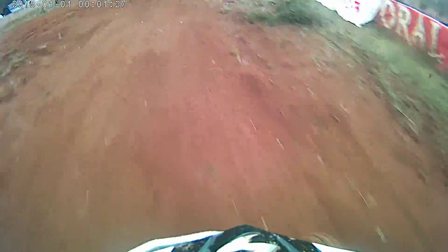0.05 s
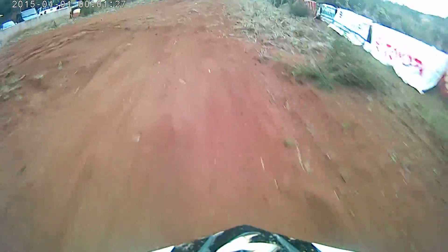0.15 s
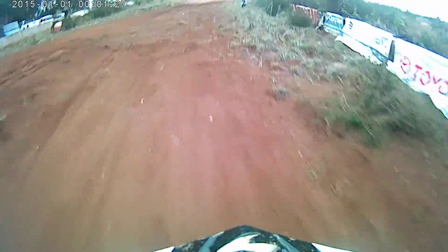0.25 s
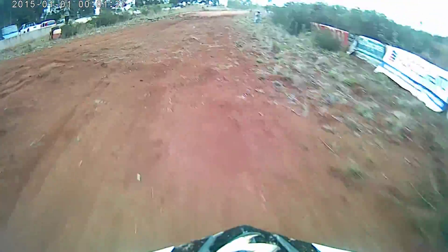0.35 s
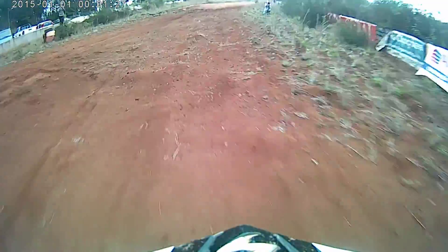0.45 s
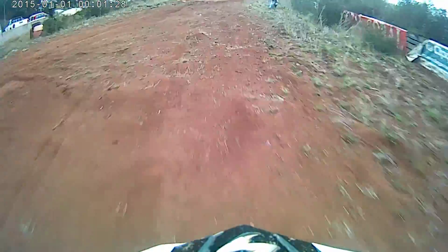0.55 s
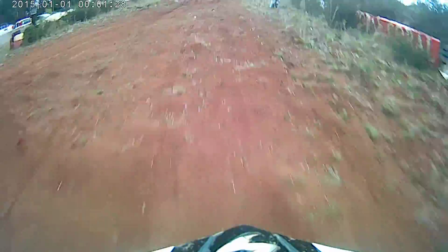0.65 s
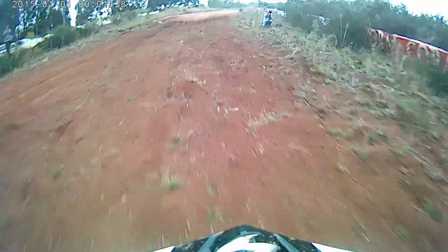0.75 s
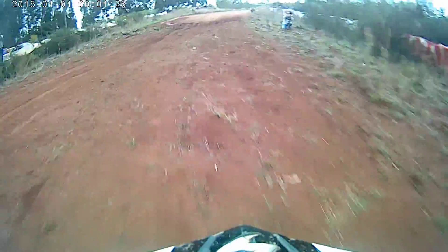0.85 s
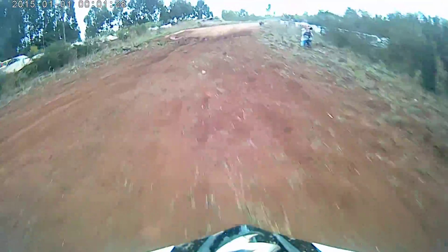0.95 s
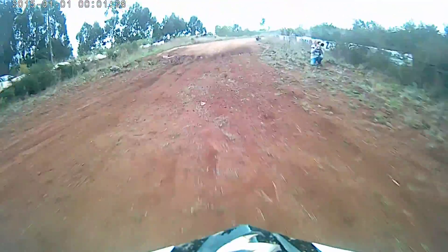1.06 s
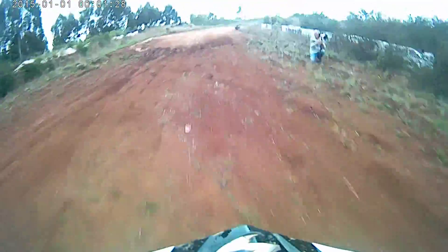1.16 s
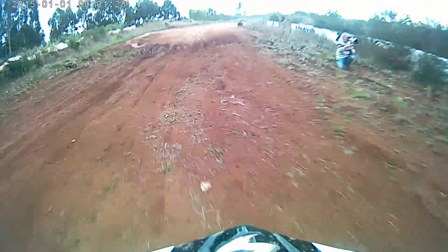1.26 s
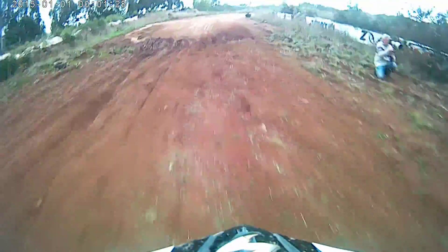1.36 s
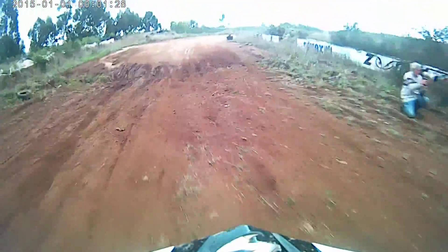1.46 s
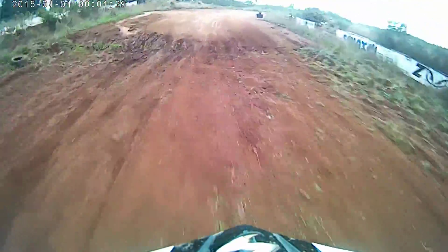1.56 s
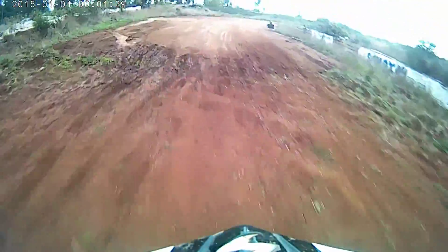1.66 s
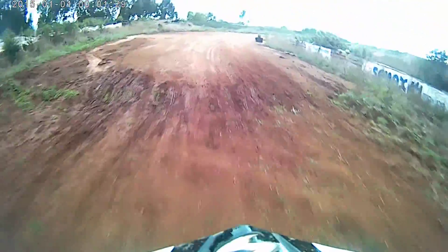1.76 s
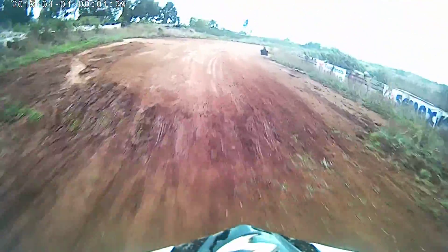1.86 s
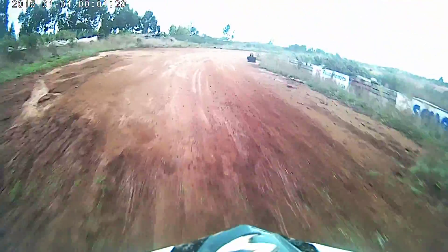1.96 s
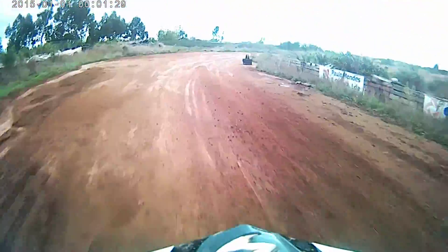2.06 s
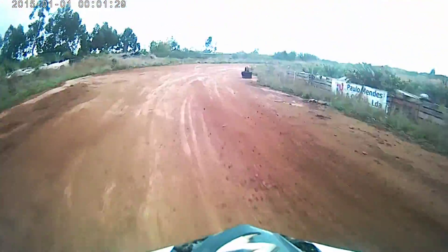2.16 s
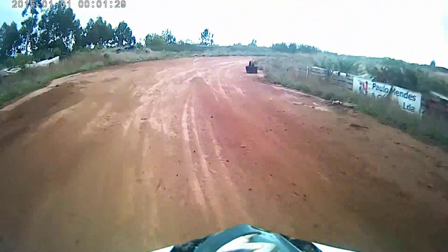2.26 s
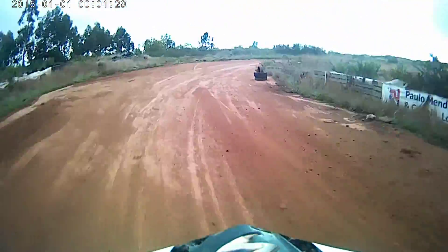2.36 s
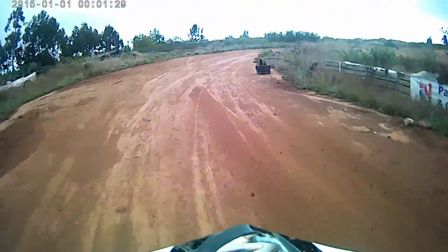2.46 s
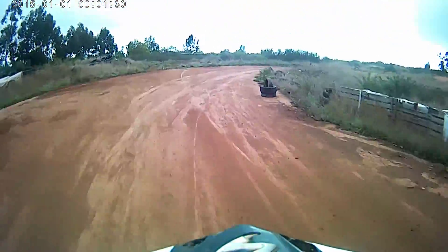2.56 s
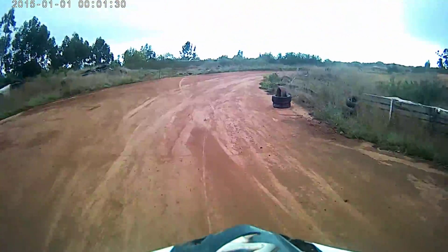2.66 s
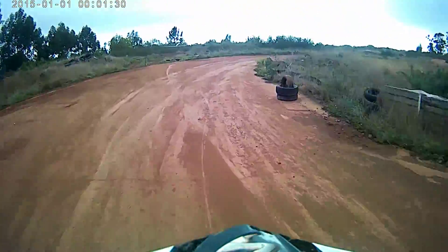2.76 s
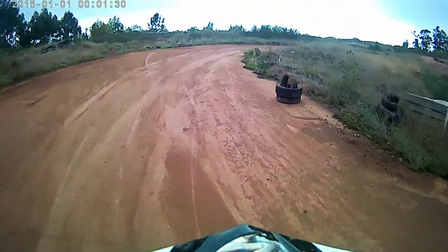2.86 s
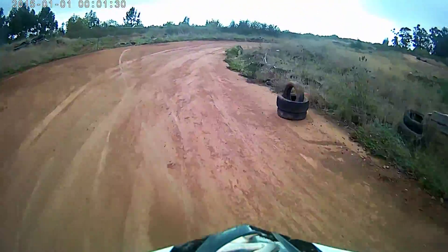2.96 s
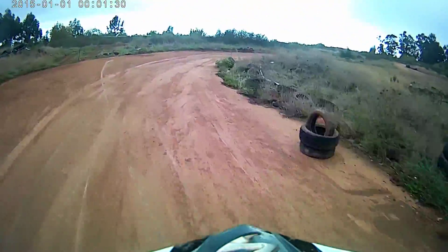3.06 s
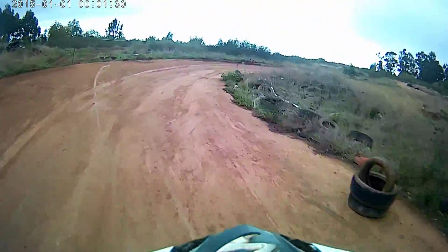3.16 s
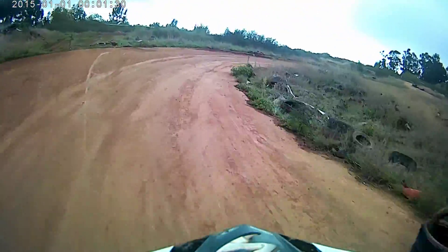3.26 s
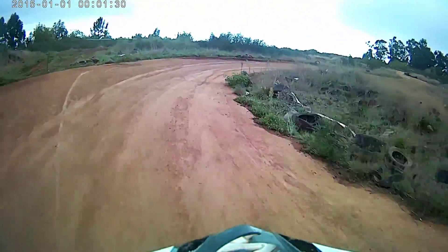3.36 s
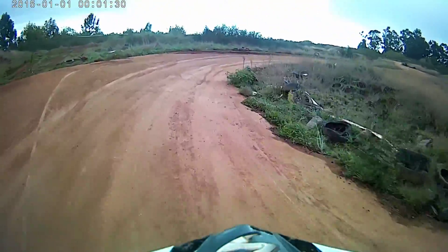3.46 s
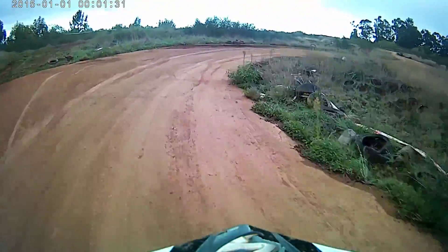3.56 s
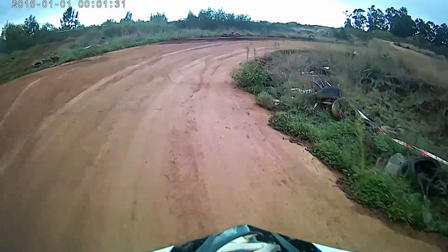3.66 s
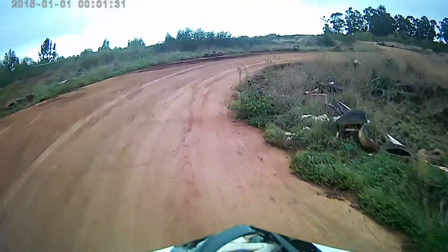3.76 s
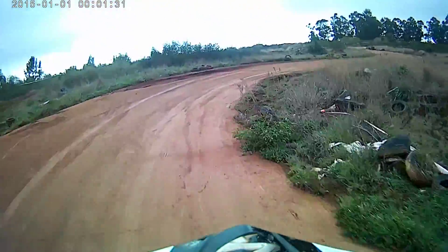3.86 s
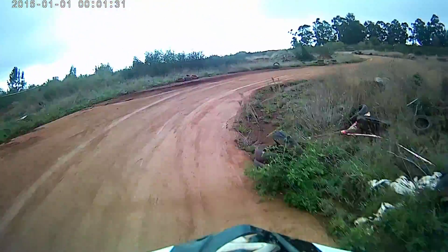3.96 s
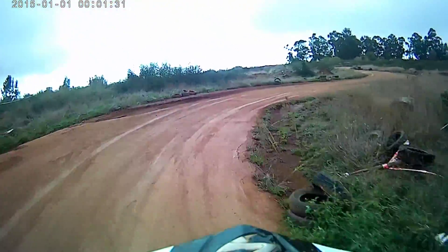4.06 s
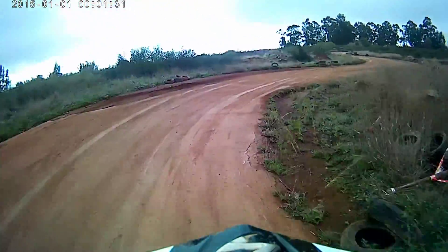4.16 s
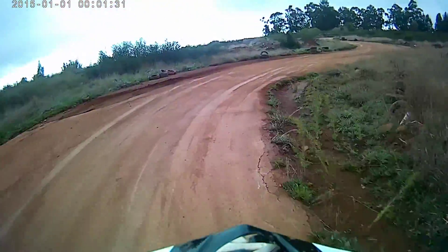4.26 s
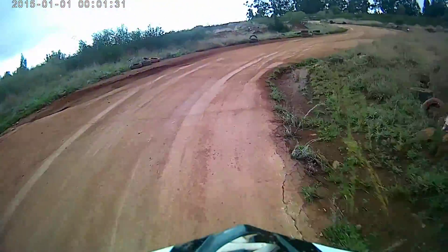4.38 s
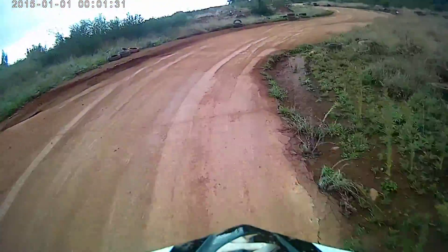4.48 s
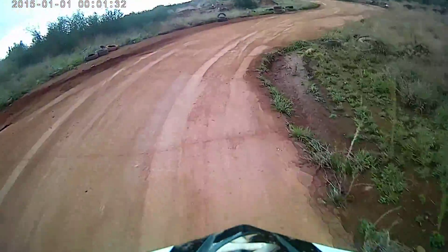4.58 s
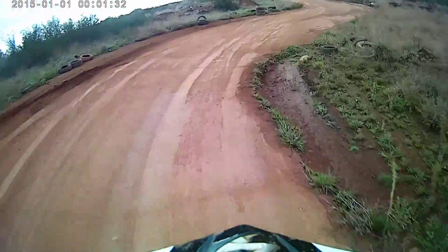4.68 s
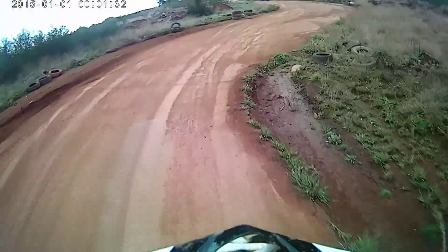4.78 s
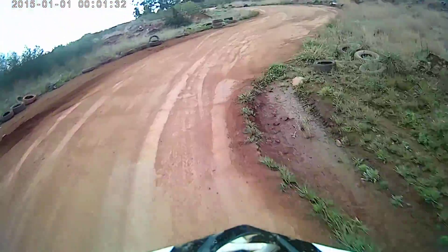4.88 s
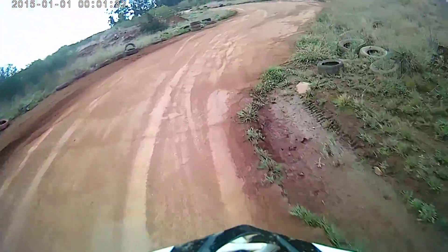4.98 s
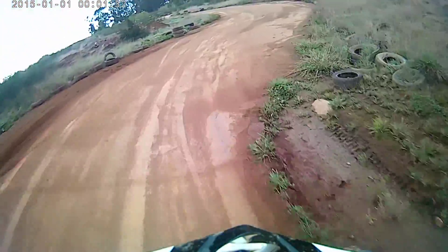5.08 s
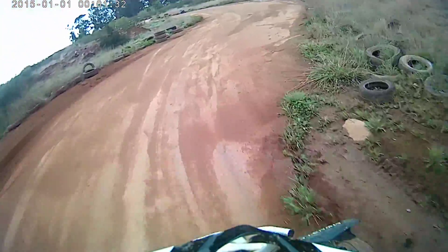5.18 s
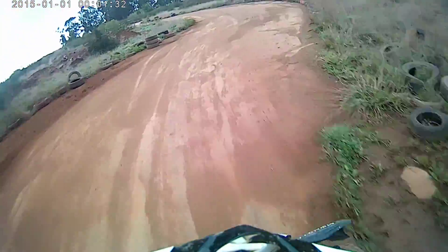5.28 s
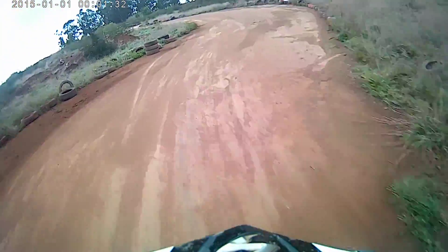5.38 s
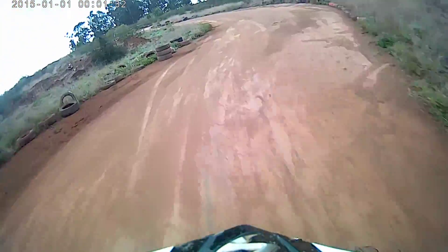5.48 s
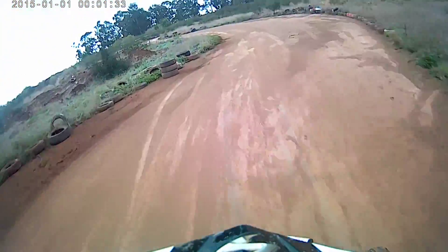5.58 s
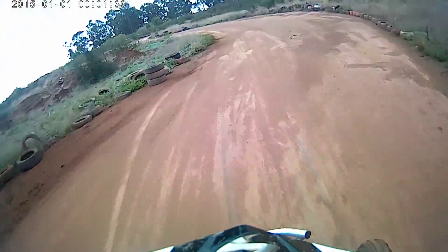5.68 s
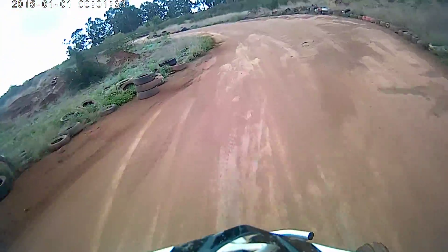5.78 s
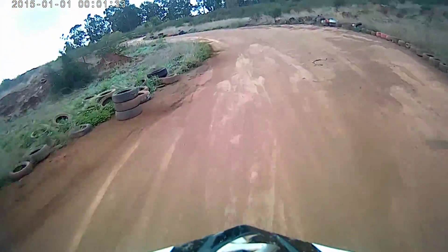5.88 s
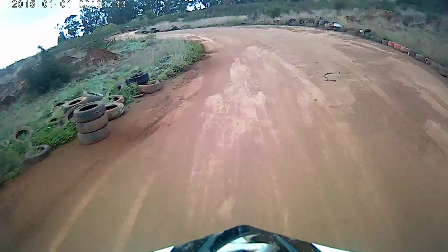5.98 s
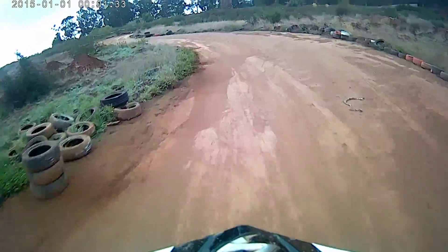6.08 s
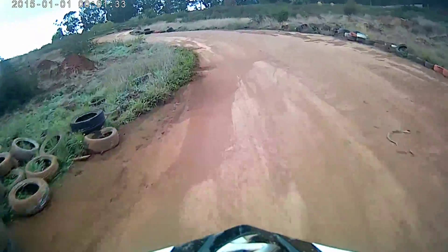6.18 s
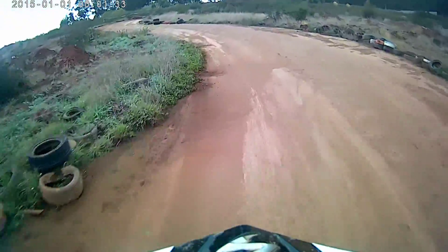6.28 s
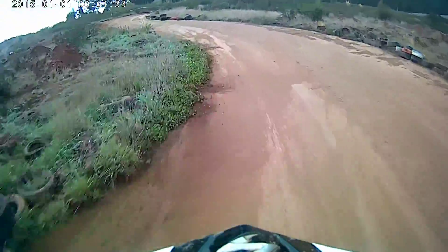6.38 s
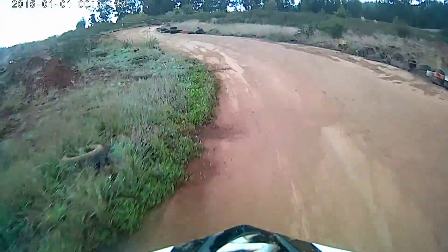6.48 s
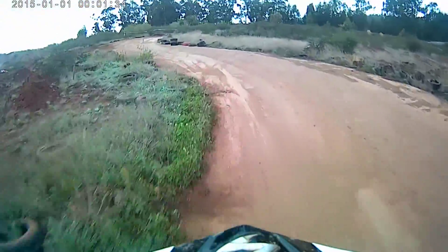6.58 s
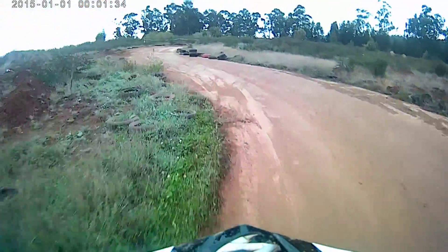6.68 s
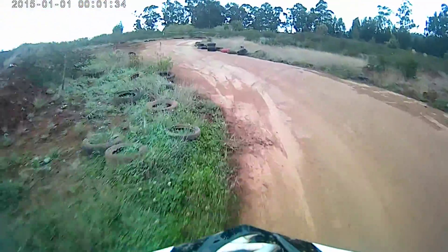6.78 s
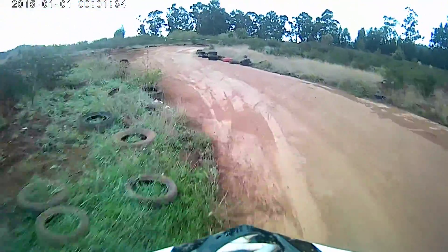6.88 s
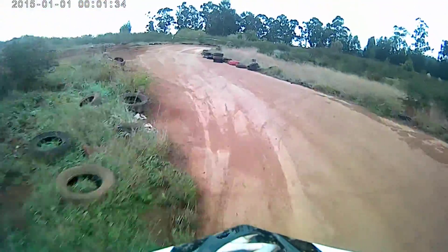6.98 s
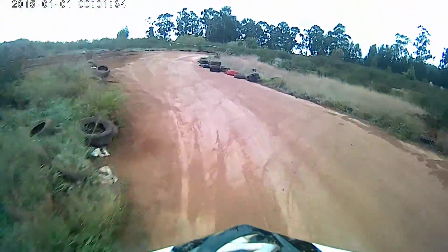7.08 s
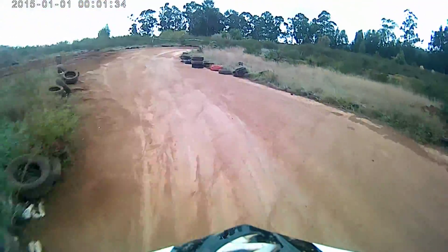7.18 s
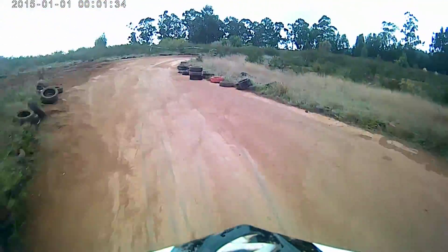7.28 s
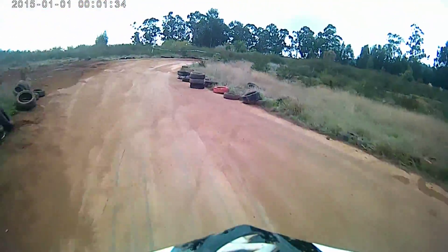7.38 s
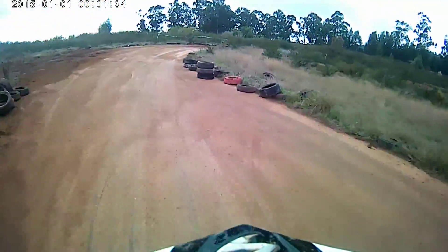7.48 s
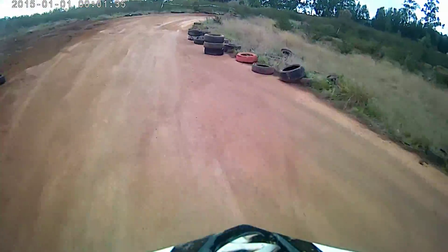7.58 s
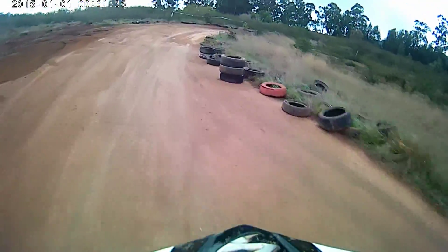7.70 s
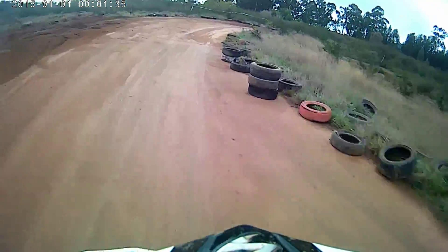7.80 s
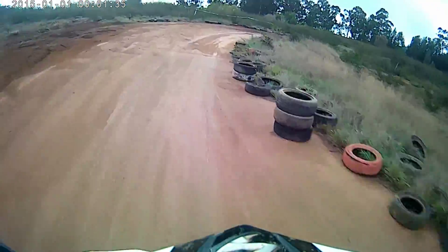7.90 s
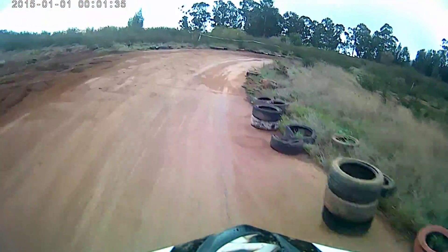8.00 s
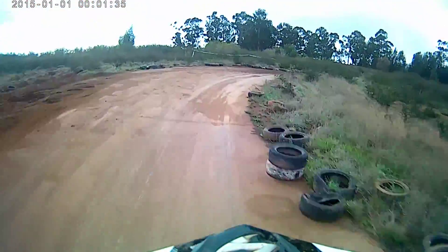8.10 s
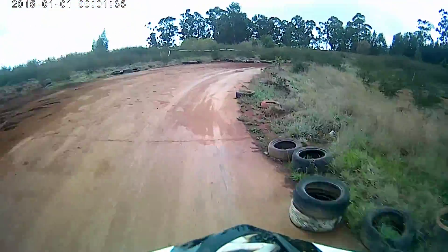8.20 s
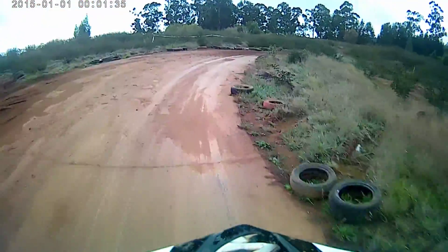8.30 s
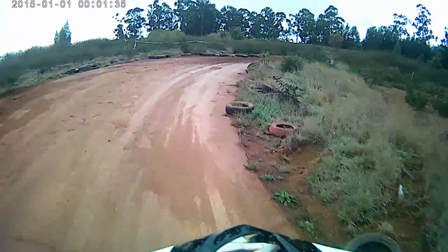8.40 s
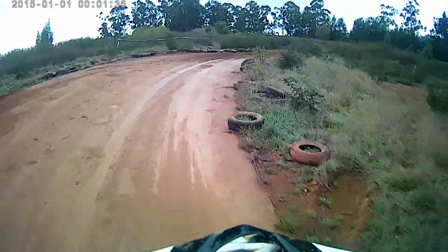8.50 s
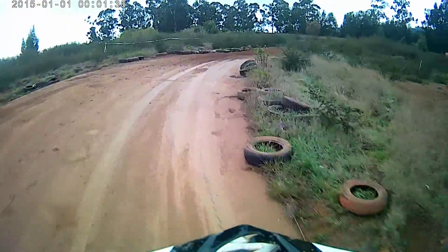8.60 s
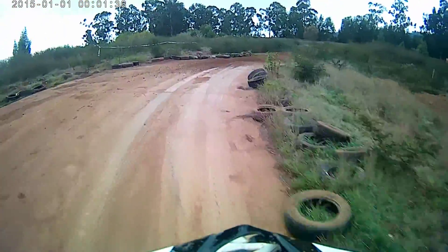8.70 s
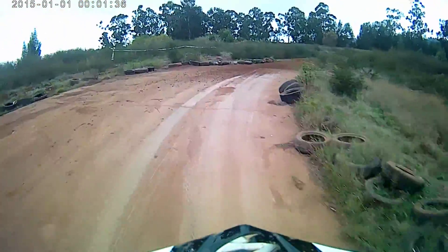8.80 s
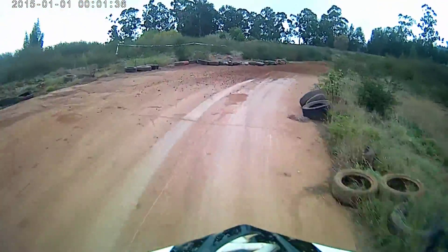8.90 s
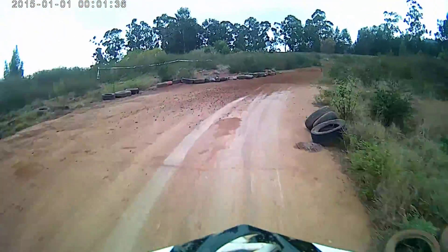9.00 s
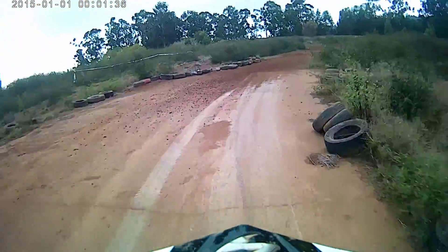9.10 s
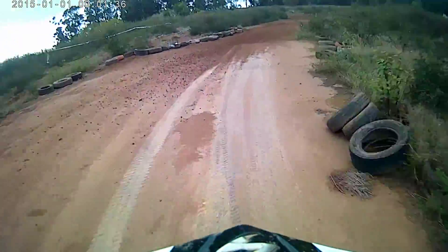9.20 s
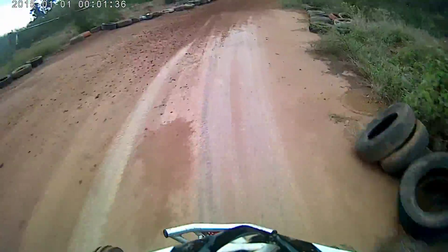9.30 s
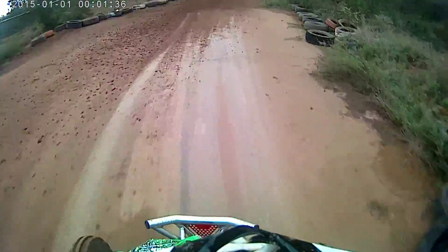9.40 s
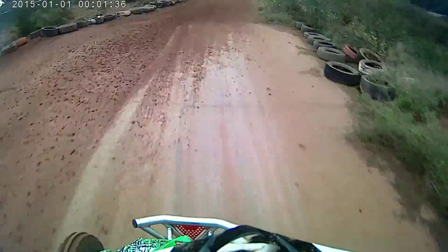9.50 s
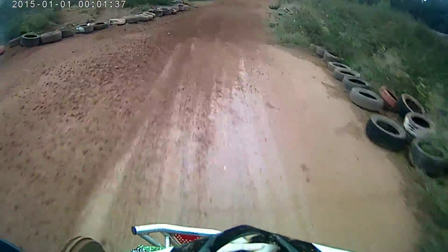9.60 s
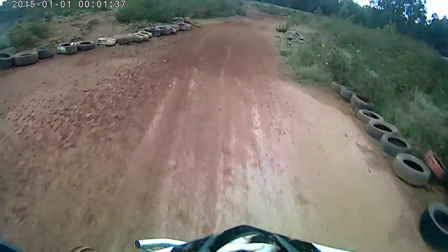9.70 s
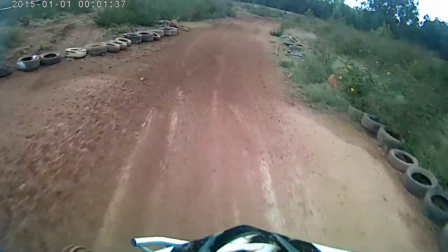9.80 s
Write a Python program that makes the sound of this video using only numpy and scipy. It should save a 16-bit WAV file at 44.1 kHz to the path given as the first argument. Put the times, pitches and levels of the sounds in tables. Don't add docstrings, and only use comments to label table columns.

```python
import sys
import numpy as np
from scipy import signal
from scipy.fft import rfft, irfft, next_fast_len
from scipy.io import wavfile
from scipy.ndimage import uniform_filter1d

SR = 44100
rng = np.random.default_rng(int(sys.argv[2]) if len(sys.argv) > 2 else 0)


def volts_from_db(level):
    exponent = np.asarray(level, float) / 20
    return 10 ** exponent


def wav_out(sig):
    wavfile.write(sys.argv[1], SR, np.round(np.clip(np.atleast_2d(sig).T, -1, 1) * 32767).astype(np.int16))


N = 434385
TOP_RATE_HZ = 72


def rms_one(x):
    return x / np.sqrt(np.mean(x ** 2) + 1e-20)


def in_time(rows):
    time_s, *columns = np.transpose(rows)
    return [np.interp(np.arange(N) / SR, time_s, column) for column in columns]


def at_hz(points, hz):
    curve_hz, curve_db = np.array(points).T[:2]
    return np.interp(np.log(hz), np.log(curve_hz), curve_db)


def drift(rate_hz):
    r = np.exp(-80 * np.pi * rate_hz / SR)
    slow = signal.lfilter([1], [1, -2 * r, r * r], rng.standard_normal(N // 40 + 2002))[2000:]
    return np.interp(np.arange(N) / 40, np.arange(len(slow)), rms_one(slow))


def band_noise_filter(order, low_hz, high_hz, x):
    return signal.sosfilt(signal.butter(order, [low_hz, high_hz], "band", fs=SR, output="sos"), x)


def evened(x, seconds):
    return x / np.sqrt(uniform_filter1d(x ** 2, int(seconds * SR)) + 1e-12)


def resonate(x, modes, wander_db, sign):
    out = 0
    for k, (hz, width_hz, db) in enumerate(modes):
        r = np.exp(-np.pi * width_hz / SR)
        zeros = np.array([1, 0, -1]) * (1 - r * r) / 2
        ring = signal.lfilter(zeros, [1, -2 * r * np.cos(2 * np.pi * hz / SR), r * r], x)
        out = out + sign ** k * volts_from_db(db + wander_db * drift(1.7)) * ring
    return out


def layer_db(rate_hz, opening, base_db, db_per_hz, open_db):
    return base_db + db_per_hz * (rate_hz - 60) + open_db * opening


def controls():
    # (time [s], firing rate [Hz])
    rolling = [(0.08, 56.4), (0.46, 49.0), (0.85, 50.4), (1.19, 67.8), (1.22, 66.4), (2.28, 59.2),
               (2.32, 55.9), (3.18, 47.3), (4.49, 41.9), (5.2, 51.7), (5.28, 56.0), (6.12, 68.4),
               (6.67, 58.9), (7.28, 56.8), (7.76, 63.9), (8.4, 49.3), (8.58, 46.1), (9.54, 53.5)]
    # (opens [s], shuts [s], roll-on [s], opening [0-1.3], wheelspin [Hz of firing])
    bursts = [(-0.086, 0.375, 0.15, 0.59, 23.2), (0.355, 0.796, 0.17, 0.64, 27.6),
              (0.813, 0.997, 0.08, 0.74, 24.6), (1.217, 1.358, 0.03, 0.19, -1.8),
              (1.319, 1.463, 0.13, 0.74, 14.6), (1.534, 1.763, 0.16, 0.66, 11.0),
              (1.945, 2.163, 0.06, 0.05, 2.2), (2.983, 3.112, 0.09, 0.11, 7.6),
              (3.298, 3.645, 0.14, 0.02, 10.6), (3.452, 3.64, 0.04, 0.25, -1.1),
              (4.505, 5.408, 0.31, 0.93, 9.4), (5.395, 5.57, 0.12, 1.06, 5.4),
              (5.586, 6.171, 0.12, 0.91, 4.4), (6.222, 6.42, 0.26, 1.29, 13.9),
              (6.615, 6.738, 0.2, 0.94, 9.4), (6.787, 7.091, 0.24, 0.79, 7.8),
              (7.283, 7.466, 0.09, 0.93, 11.4), (7.459, 7.826, 0.1, 0.82, 14.3),
              (8.559, 8.763, 0.12, 0.57, 11.8), (8.903, 9.658, 0.24, 0.72, 16.2),
              (9.676, 9.97, 0.11, 0.96, 15.0)]
    shut_s, spin_down_s, flywheel_s = .088, .128, .014
    hang_s, snap_s, regrip_s = .035, .025, .03
    t, opening, spin_hz = np.arange(N) / SR, np.zeros(N), np.zeros(N)
    next_opens = [row[0] for row in bursts[1:]] + [np.inf]
    for (opens, shuts, roll_on, amount, wheelspin), following in zip(bursts, next_opens):
        rise = (t - opens) / roll_on
        if following - shuts < regrip_s:
            fall = (shuts - t) / shut_s
        else:
            fall = (shuts + hang_s - t) / snap_s
        spin_fall = (shuts - t) / spin_down_s
        opening += amount * np.clip(np.minimum(rise, 1 + fall), 0, 1)
        spin_hz += wheelspin * np.clip(np.minimum(rise, 1 + spin_fall), 0, 1)
    r = np.exp(-1 / (flywheel_s * SR))
    lagged_hz = signal.lfilter([1 - r], [1, -r], spin_hz, zi=[r * spin_hz[0]])[0]
    rate_hz = in_time(rolling)[0] + lagged_hz
    pick_up = uniform_filter1d(np.gradient(rate_hz) * SR, SR // 10)
    return rate_hz, opening, pick_up


def engine_load(rate_hz, throttle, pick_up):
    open_load = 0.2 + .012 * np.maximum(TOP_RATE_HZ - rate_hz, 0)
    return np.clip(0.084 + open_load * throttle + 0.0013 * pick_up, 0, 1)


def exhaust_boom(cycles, rate_hz, opening, throttle, rough):
    # (frequency [Hz], level [dB])
    exhaust = [(80, -1), (125, 0.5), (170, -8.5), (215, -2.5), (265, -6.5), (320, -1.5), (360, -10.5),
               (405, -23), (440, -12), (490, -2), (600, -14.5), (670, -25), (780, -10.5), (1100, -27)]
    # (order, level at open throttle [dB], level at shut throttle [dB])
    pulse = [(2, -7, 1.5), (3, 2, 0), (4, -5.5, 2), (5, 4, 1), (6, -1, 1.5), (7, -1, -0.5), (8, 1, -1),
             (9, 3.5, -0.5), (10, -1, -0.5), (11, 2.5, -9.5), (12, -5.5, -2), (13, 0, -6), (14, 0, 1.5)]
    pipe_hz, pipe_width_hz, pipe_lift_db = 320, 13, 9
    first_db = layer_db(rate_hz, opening, -31, .35, 5.7)
    lug_db = 0.2374 * throttle * np.maximum(TOP_RATE_HZ - rate_hz, 0)
    boom_db = layer_db(rate_hz, opening, -25, 0.18, 3.1) + lug_db
    plain, coloured = 0, 0
    angle = 2 * np.pi * (cycles + 0.1097)
    for k, open_db, shut_db in pulse:
        order_hz = k * rate_hz
        flutter_db = (1 + 3 * rough) * drift(12)
        waver = .09 * rough * k * drift(16)
        shape_db = open_db * throttle + shut_db * (1.5 - throttle)
        level = volts_from_db(at_hz(exhaust, order_hz) + shape_db + flutter_db)
        tone = -level * np.cos(k * angle + rng.normal(0, 0.74) + waver)
        on_pipe = (1 - rough) * np.exp(-((order_hz - pipe_hz) / pipe_width_hz) ** 2)
        plain = plain + tone
        coloured = coloured + tone * volts_from_db(pipe_lift_db * on_pipe)
    first = -np.sqrt(2) * volts_from_db(first_db + 2.0 * drift(34.0) + 2.1 * drift(4.8)) * np.cos(angle)
    half = volts_from_db(first_db - 12.5) * np.cos(angle / 2 + 2.4 * drift(1.5))
    orders = coloured / np.sqrt(uniform_filter1d(plain ** 2, SR // 10))
    return first + half + volts_from_db(boom_db - 0.74) * orders


def firings(cycles, load, sharp, fade, spread_db, floor):
    turn = cycles.astype(int)
    strength, late = rng.standard_normal((turn[-1] + 2, 2)).T
    clicks = np.zeros(N)
    at = np.flatnonzero(np.diff(turn)) + 1
    jitter = (late[turn[at]] * .00009 * SR).astype(int)
    clicks[np.clip(at + jitter, 0, N - 1)] = 1
    blow_down = np.exp(-fade * (cycles % 1))
    valve_puff = .33 * np.exp(-fade * ((cycles + .52) % 1))
    puffs = (blow_down + valve_puff) * rng.standard_normal(N)
    gated = (sharp * load * clicks + puffs) * volts_from_db(spread_db * strength[turn])
    return gated + floor * (1.15 - load) * rng.standard_normal(N)


def case_bark(cycles, load, rate_hz, opening):
    # (frequency [Hz], width [Hz], level [dB])
    case_modes = [(840, 80, -7.5), (1080, 90, -10), (1255, 178, 5), (1375, 71, 2.5), (1550, 80, 0.5),
                  (1665, 120, 5), (1838, 69, -3.5), (2148, 250, -6.5)]
    blasts = firings(cycles, load, sharp=35, fade=3.4, spread_db=1.3, floor=.46)
    ringing = resonate(blasts, case_modes, wander_db=4.0, sign=0.94)
    bark = band_noise_filter(4, 920, 2200, ringing)
    return volts_from_db(layer_db(rate_hz, opening, -27.5, 0.32, 9.09) + 0.74) * evened(bark, .06)


def panel_knocks(cycles, load, rate_hz, opening):
    # (frequency [Hz], width [Hz], level [dB])
    panels = [(496.6, 70, 0.5), (586, 140, -1), (791, 110, -3.5)]
    blows = firings(cycles, load, sharp=42, fade=4, spread_db=2, floor=.2)
    knocks = resonate(blows, panels, wander_db=2.0, sign=-0.98)
    return volts_from_db(layer_db(rate_hz, opening, -38.5, .2, 10.3)) * evened(knocks, .1)


def valve_clatter(cycles, load, rate_hz, opening):
    # (frequency [Hz], width [Hz], level [dB])
    gear = [(2772, 333, -3), (3214, 290, 0), (3545, 800, -9)]
    taps = firings(cycles, load, sharp=6.5, fade=3.4, spread_db=4.5, floor=.9)
    clatter = resonate(taps, gear, wander_db=1.5, sign=-1.076)
    return volts_from_db(layer_db(rate_hz, opening, -43.5, 0.4, 5) + 1.0) * evened(clatter, .12)


def terrain():
    # (time [s], pressure [full scale], length [ms], rebound share)
    jolts = [(0.022, -0.58, 24.6, 0.17), (0.212, 0.43, 20.3, 1.5), (0.256, -0.3, 14, 0.3),
             (0.327, 0.32, 61, 1.11), (0.359, -0.76, 26, 1.07), (0.434, 0.31, 45, 0.9),
             (0.601, 0.21, 34, 1.4), (0.747, 0.36, 16.5, 2.5), (0.82, 0.65, 28, 1),
             (0.954, 0.23, 30.4, 2.3), (1.079, 0.29, 27, 0.0), (1.102, 0.25, 13.8, 2.9),
             (1.112, 0.23, 11.5, 2.5), (1.192, 0.3, 13, 0.8), (1.536, 0.38, 35, 1.1),
             (1.75, -0.23, 36, 1.5), (1.925, -0.15, 51, 0.2), (2.105, -0.27, 36, 1.7),
             (2.188, 1.11, 17, -0.14), (2.197, -1.1, 43, 0.28), (2.389, -0.3, 31, 0.5),
             (2.543, 0.16, 30.3, 1), (3.858, 0.12, 37.2, 1.5), (3.976, 0.23, 40, 0.86),
             (6.083, -0.061, 30.7, 3), (7.321, 0.33, 33.1, -0.4), (7.643, -0.23, 30.2, 0.4),
             (9.256, 0.26, 27.2, 2.3)]
    # (time [s], frequency [Hz], level [dB], t60 [s])
    thuds = [
        (2.232, 68, 2.5, 0.054),
        (1.11, 180, -16.5, 0.073),
    ]
    # (time [s], level [dB])
    shake = [
        (0.0, -21.5),
        (2.2, -25),
        (4.3, -29.5),
        (9.85, -24.5),
    ]
    rebound_lengths = 1.39
    t, out = np.arange(N) / SR, np.zeros(N)
    for s, pressure, ms, rebound in jolts:
        near = slice(max(int((s - .15) * SR), 0), int((s + .25) * SR))
        lengths = (t[near] - s) * 1000 / ms
        shove = 2. ** (-4 * lengths ** 2)
        swing_back = rebound * 2. ** (-4 * (lengths - rebound_lengths) ** 2)
        out[near] += pressure * (shove - swing_back)
    for s, hz, db, t60 in thuds:
        age = np.maximum(t - s, 0)
        out += volts_from_db(db - 60 * age / t60) * np.sin(2 * np.pi * hz * age)
    bumps = band_noise_filter(2, 4.5, 16.0, rng.standard_normal(N + SR))[SR:]
    return out + volts_from_db(in_time(shake)[0]) * rms_one(bumps)


def wind(level_db):
    # (frequency [Hz], level [dB per Hz])
    spectrum_db = [(30, -18), (60, 1.5), (120, -16.5), (250, -8.5), (400, -16), (600, -16), (900, -12)]
    out, edges_hz = 0, 28 * 2 ** np.arange(0, 5.1, .5)
    white = rng.standard_normal((2, N))
    for k, (low, high) in enumerate(zip(edges_hz, edges_hz[1:])):
        band = band_noise_filter(2, low, high, white[k % 2])
        out = out + band * volts_from_db(at_hz(spectrum_db, np.sqrt(low * high)) + 1.0 * drift(7.4))
    return volts_from_db(level_db) * rms_one(out)


def scene():
    # (time [s], roughness [0-1])
    ground = [
        (0, 1),
        (1.8, .9),
        (2.3, .25),
        (3.0, .25),
        (4.5, .4),
        (4.7, .15),
        (9.85, .18),
    ]
    rate_hz, opening, pick_up = controls()
    throttle = np.clip(opening * 1.35, 0, 1)
    load = engine_load(rate_hz, throttle, pick_up)
    rough = np.clip(in_time(ground)[0] + .004 * np.abs(pick_up), 0, 1)
    cycles = np.cumsum(rate_hz) / SR
    engine = exhaust_boom(cycles, rate_hz, opening, throttle, rough)
    engine += case_bark(cycles, load, rate_hz, opening)
    engine += panel_knocks(cycles, load, rate_hz, opening)
    engine += valve_clatter(cycles, load, rate_hz, opening)
    rush = wind(layer_db(rate_hz, opening, -29.5, 0.28, 0.67))
    return (engine + terrain() + rush)[None]


def low_pass(x):
    return signal.sosfilt(signal.butter(12, 15870, fs=SR, output="sos"), x)


def record(dry):
    # (low edge [Hz], high edge [Hz], share of time kept [0-1])
    fringe = [(3560, 3690, .8), (3690, 3830, .6), (3830, 3960, .35), (3960, 4100, .3), (4180, 4320, .45),
              (4320, 4520, .35)]
    frame, overload = 1024, .704
    squeezed = dry / (1 + (dry / .86) ** 4) ** .25
    narrow = signal.sosfilt(signal.butter(9, 3750, fs=SR, output="sos"), squeezed)
    size = next_fast_len(N)
    spectrum, hz = rfft(narrow, size), np.arange(size // 2 + 1) * SR / size
    kept = irfft(spectrum * (hz < fringe[0][0]), size)[:, :N]
    frames = np.arange(N // frame + 2)
    for low, high, share in fringe:
        on = np.repeat(rng.random(len(frames)) < share, 2)[:len(frames)]
        gate = np.sin(np.pi / 2 * np.interp(np.arange(N) / frame, frames, on)) ** 2
        band = irfft(spectrum * (hz >= low) * (hz < high), size)[:, :N]
        kept += volts_from_db(1.0) * gate * band
    return low_pass(np.clip(kept, -overload, overload))


dry = scene()
out = record(dry)
wav_out(out)
```